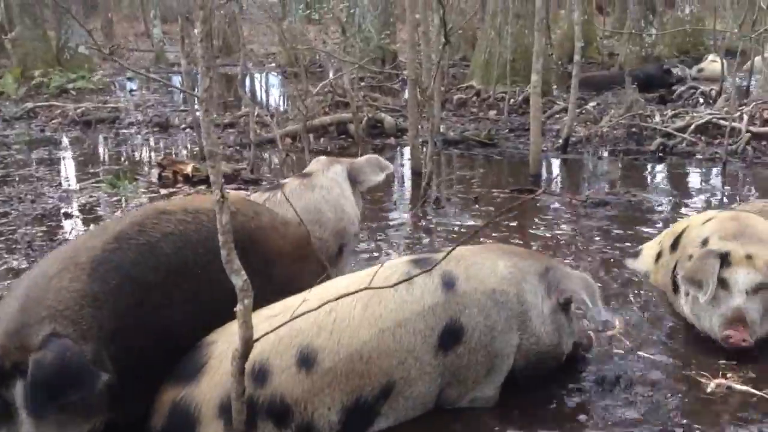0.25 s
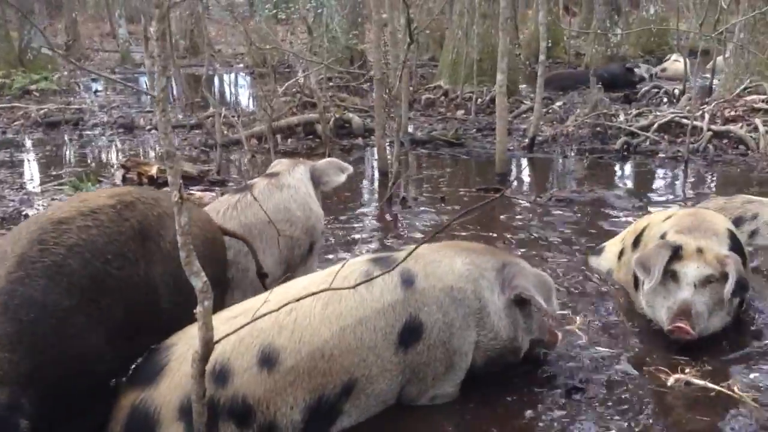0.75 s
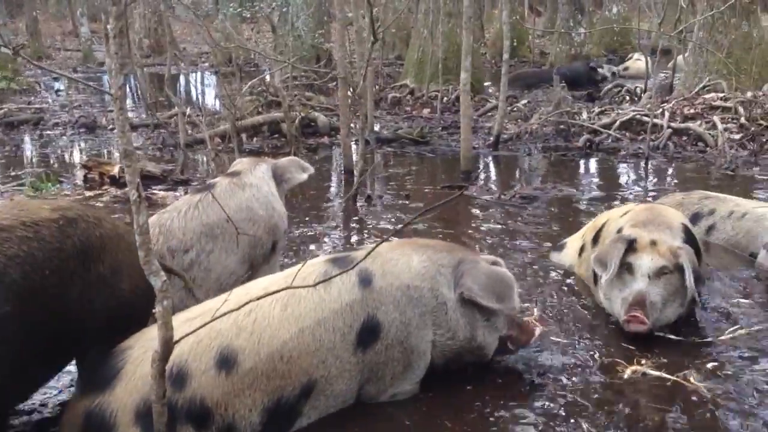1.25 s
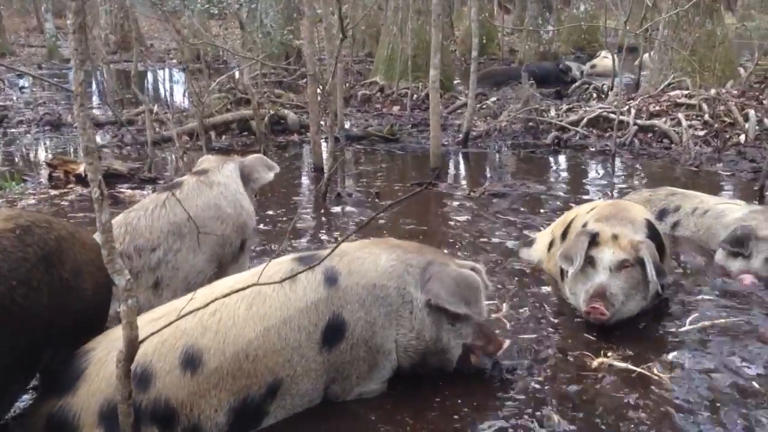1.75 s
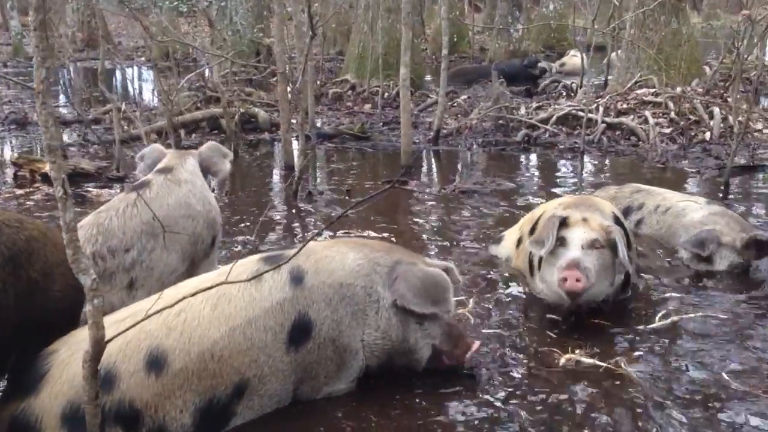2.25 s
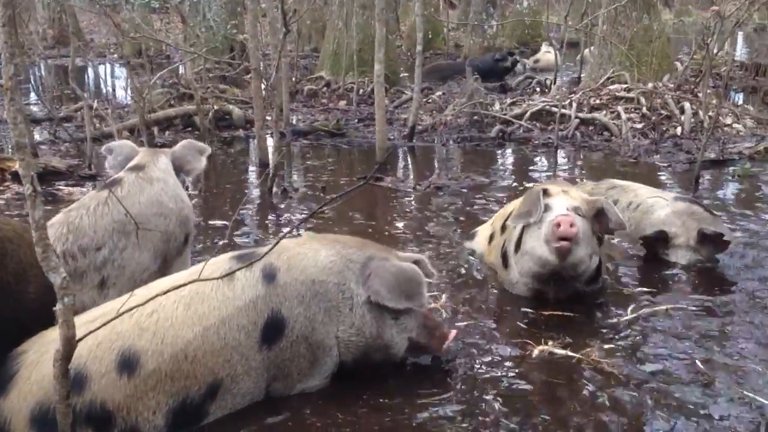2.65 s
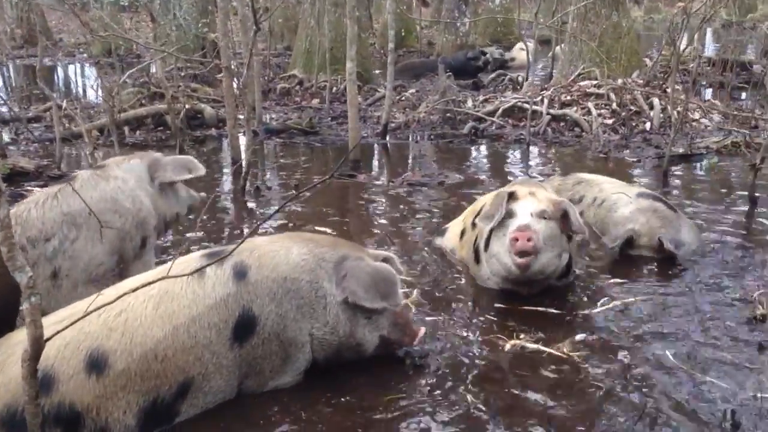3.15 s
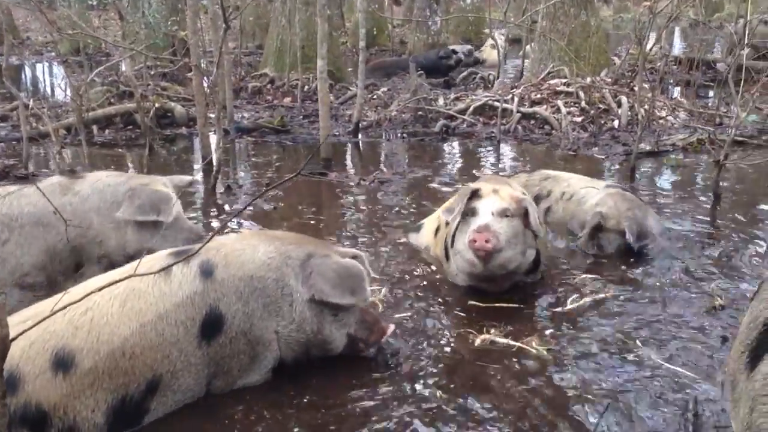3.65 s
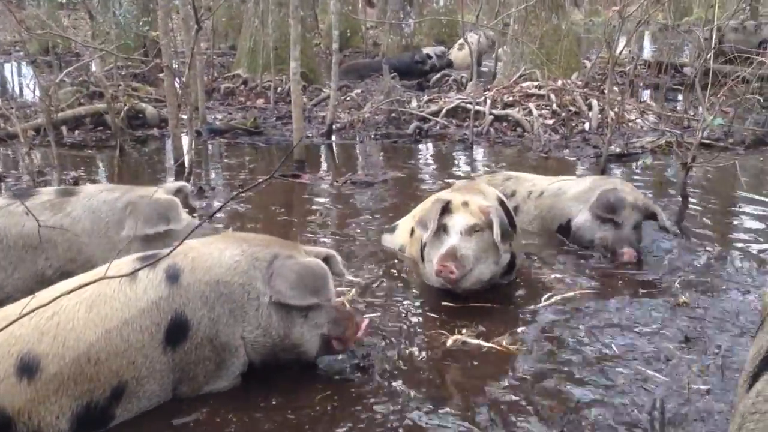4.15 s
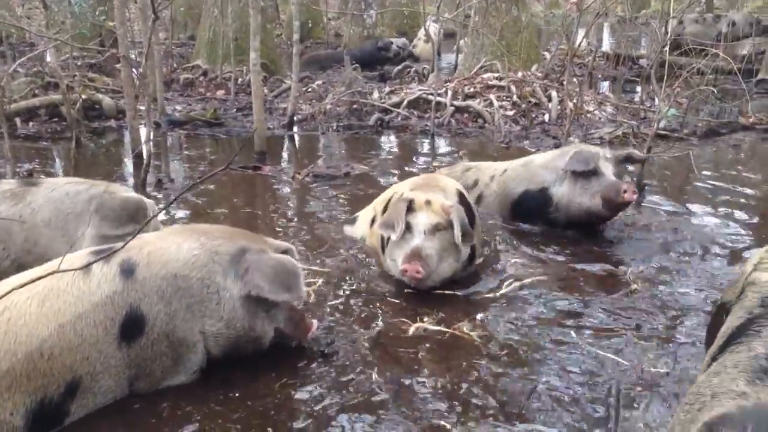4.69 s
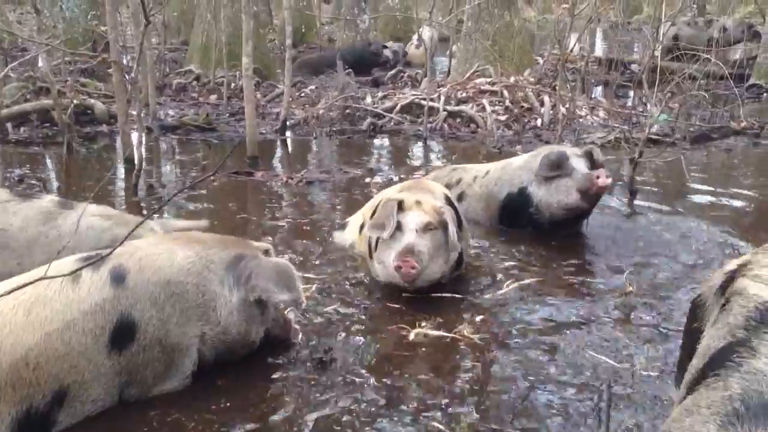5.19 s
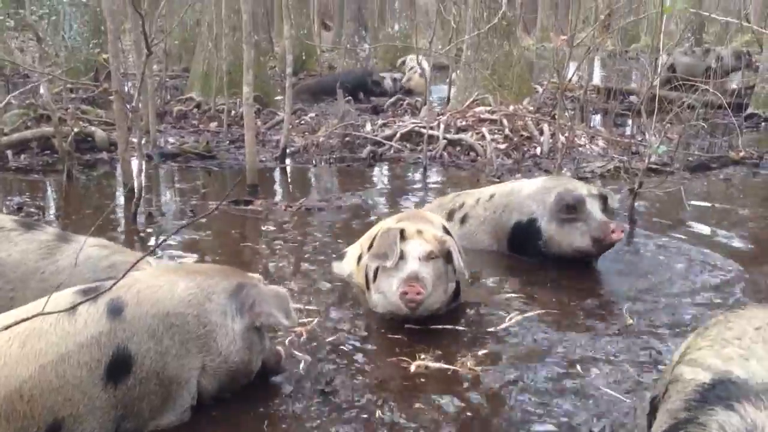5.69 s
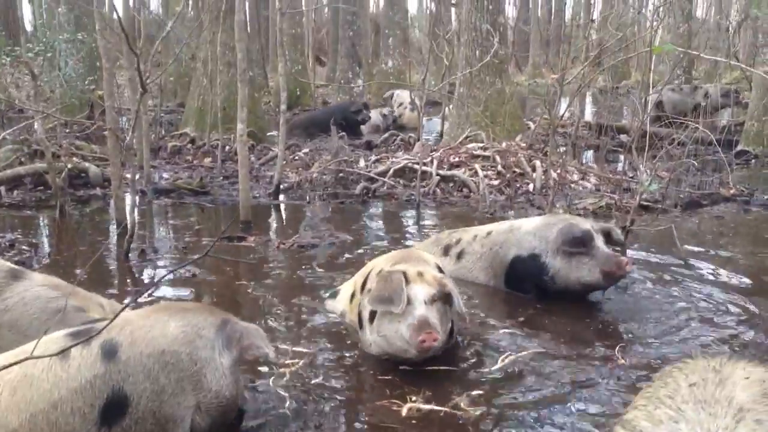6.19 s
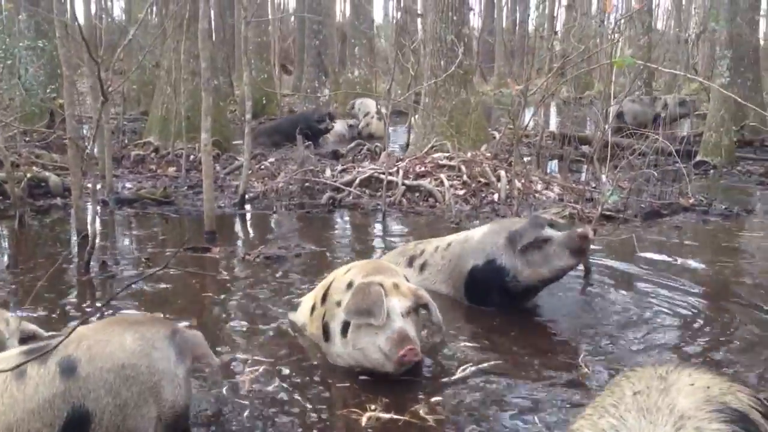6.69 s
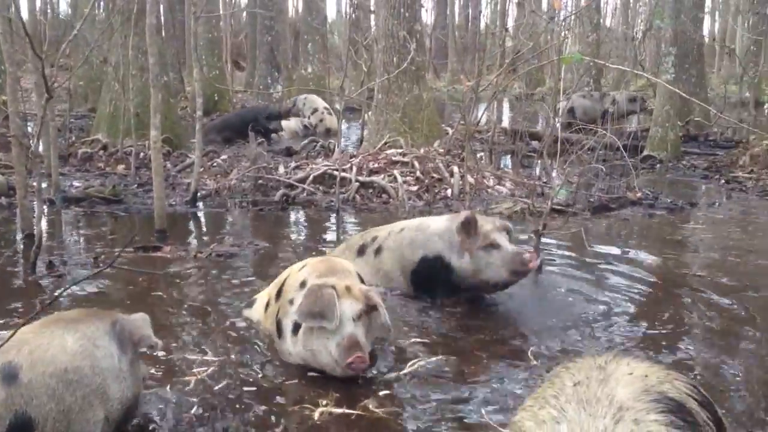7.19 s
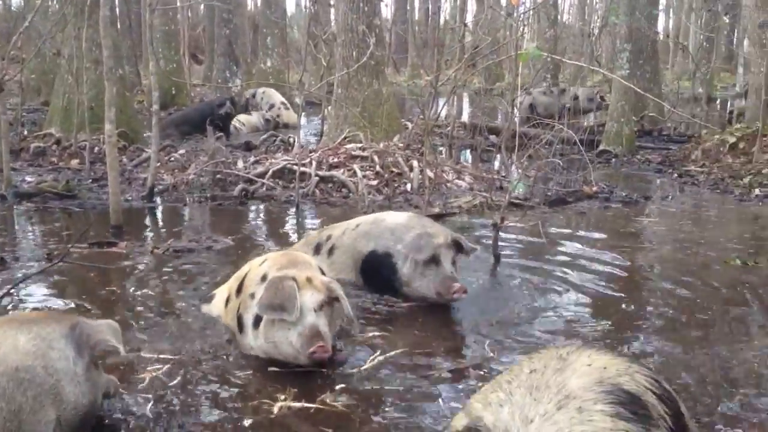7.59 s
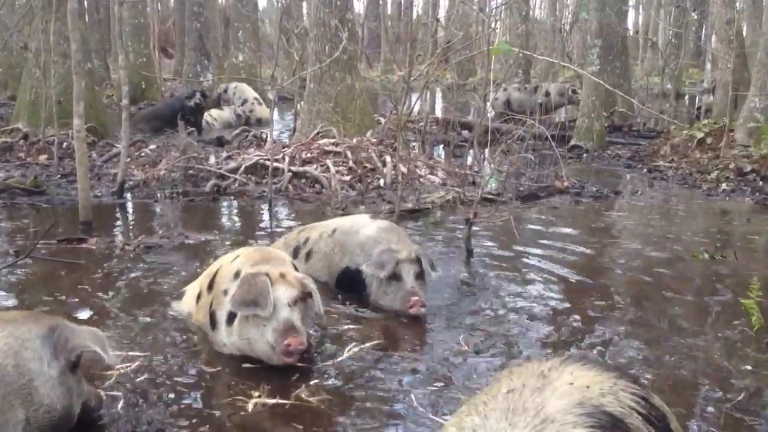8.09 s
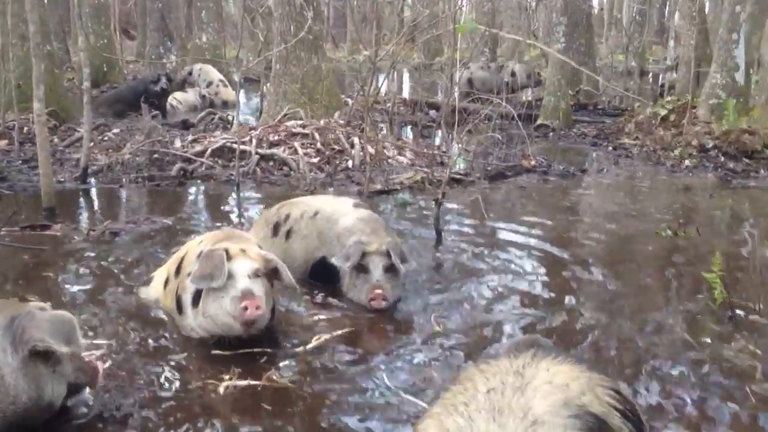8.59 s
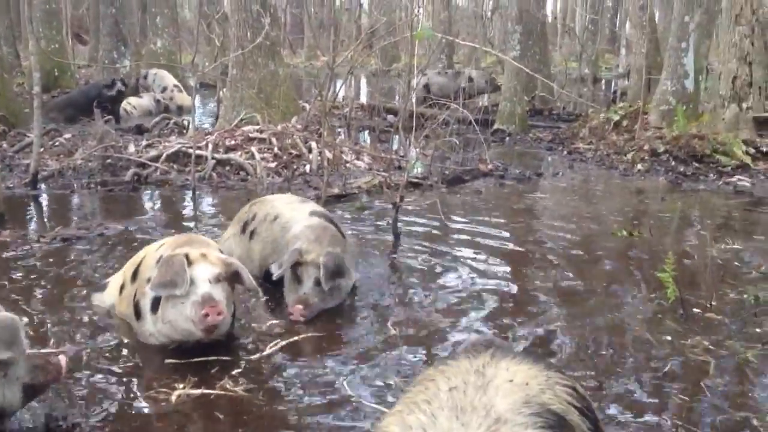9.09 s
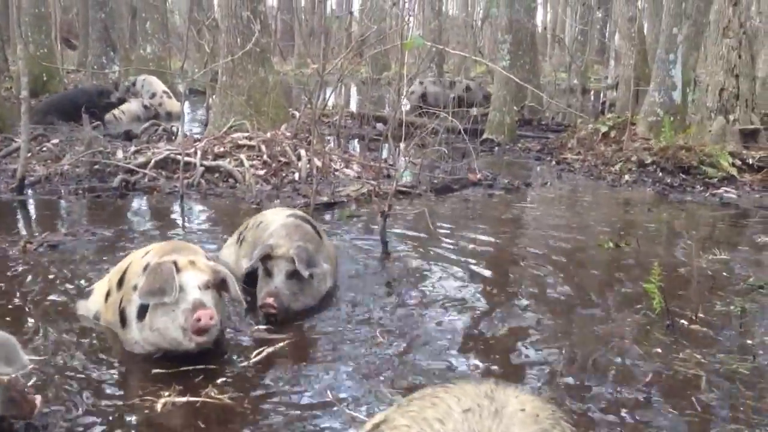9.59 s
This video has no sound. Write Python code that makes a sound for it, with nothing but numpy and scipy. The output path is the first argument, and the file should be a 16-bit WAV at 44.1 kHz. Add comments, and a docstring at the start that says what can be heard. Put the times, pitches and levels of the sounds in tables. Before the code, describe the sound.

Pigs wallow and root in shallow water in a wood. Short, low, nasal grunts come singly at irregular gaps, a fluttering throat rattle over a soft hum. Around them water laps and trickles constantly, with small splashes, bubbly glugs and one loud early plop. Grunts grow stronger in the second half. Close, natural outdoor pickup, faint air and slight echo from trunks.

```python
"""Pigs grunt, mutter and root in shallow water among trees, over ripples, swashes and faint outdoor air.
A grunt is a slow train of throat flaps that ring the snout, over a low, throbbing nasal hum.
Plops and a short squeak are damped, rising tones; glugs are gargling tones that glide.
Splashes and stirred water are bubble clouds and shaped noise; surges are swelling rushes of noise.
The trunks return faint, scattered echoes of the pigs and splashes."""
import sys
import numpy as np
from scipy import signal
from scipy.fft import rfft, irfft, next_fast_len
from scipy.io import wavfile
from scipy.ndimage import uniform_filter1d, map_coordinates

SR = 44100
rng = np.random.default_rng(int(sys.argv[2]) if len(sys.argv) > 2 else 0)


def pcm_store(signal):
    """Save signal as 16-bit PCM."""
    levels = np.round(np.clip(np.atleast_2d(signal), -1, 1) * 32767)
    wavfile.write(sys.argv[1], SR, levels.astype(np.int16).T)


N = 433944

# Grunts, relative levels: (hum start [s], hum end [s], hum level [dB], mean hum pitch [Hz],
# loudest flap [s], its level [dB], flaps before, flaps after, build-up [dB per flap],
# nominal mouth resonance at the loudest flap [Hz], nasal squeak level [dB])
GRUNT_TABLE = [(.16, 0.316, -35.5, 190, .226, -34.5, 1, 0, 4, 1284, -40.5),
               (.72, 0.849, -37, 195, .801, -35.5, 2, 0, 4, 1650, -40.5),
               (1.546, 1.714, -34.5, 220, 1.683, -30, 0, 0, 8, 1260, -33),
               (1.97, 2.127, -37, 224.4, 2.044, -33.5, 1, 2, 7.5, 1556, -39),
               (2.505, 2.682, -37, 239.7, 2.649, -29.5, 4, 0, 2.5, 1630, -32.5),
               (2.715, 2.879, -33, 200.3, 2.792, -30, 0, 1, 5, 1105, -34),
               (4.525, 4.647, -32.5, 194.9, 4.588, -30.5, 1, 1, 10, 1275, -32.5),
               (5.08, 5.19, -32, 200, 5.135, -25.5, 2, 1, 3, 1095, -48),
               (5.325, 5.42, -36, 186, 5.356, -32.5, 0, 1, 15, 1070, -40.5),
               (5.73, 5.823, -30.5, 180, 5.782, -32.5, 1, 1, 8.5, 1410, -34),
               (6.065, 6.14, -34, 186.4, 6.110, -37.5, 0, 0, 4, 1150, -31),
               (6.535, 6.629, -42, 200, 6.589, -25.5, 1, 0, 12, 1396, -25),
               (6.92, 7.079, -31, 179.6, 7.013, -25, 3, 0, 4.5, 1250, -39.5),
               (7.36, 7.505, -36, 184.7, 7.462, -31.5, 0, 1, 7, 973, -43.5),
               (7.83, 7.985, -30, 190.1, 7.871, -24.5, 0, 2, 1, 1186, -43.5),
               (8.82, 9.123, -31.5, 180.1, 9.028, -25.5, 6, 1, 3, 1290, -41.5),
               (9.52, 9.636, -34.5, 190.8, 9.595, -37, 1, 0, 7, 1530, -42.5)]
# Spectrum of churned water: (frequency [Hz], density [dB per Hz])
SLOSH_SPECTRUM = [(110, -13), (300, -2), (550, 0.5), (1100, -1.5), (2000, -3), (4000, -20.5), (12000, -63)]
# Spectrum of fine spray: (frequency [Hz], density [dB per Hz])
SPRAY_SPECTRUM = [(300, -4.5), (1500, -4.5), (4200, 2), (8000, -4), (15500, -12)]
FLAP_HZ = 36.07


def amp(db):
    """Decibels to gain."""
    return 10 ** (np.asarray(db) / 20)


def unit(x):
    """Scale to rms 1."""
    return x / np.sqrt(np.mean(x ** 2) + 1e-20)


def along(points, hz):
    """Read (Hz, value) points on a log-frequency axis."""
    f, v = np.transpose(points)
    return np.interp(np.log(hz + 1), np.log(f + 1), v)


def clock(length_s):
    """Sample times over a length, at least 8 samples."""
    return np.arange(max(int(length_s * SR), 8)) / SR


def fade(t, t60):
    """Exponential decay of 60 dB in t60 seconds."""
    return np.exp(-np.log(1000) * t / t60)


def add(track, s, x):
    """Mix x into the track at s seconds."""
    i = int(np.clip(round(s * SR), 0, N))
    track[i:i + len(x)] += x[:N - i]


def wobble(rate_hz, size):
    """A smooth random curve through rate_hz knots a second."""
    knots = rng.standard_normal(int(size * rate_hz / SR) + 4)
    return map_coordinates(knots, [np.arange(size) * rate_hz / SR])


def filtered(x, response):
    """x times a response of frequency."""
    m = next_fast_len(N + SR // 2)
    return irfft(rfft(x, m) * response(np.fft.rfftfreq(m, 1 / SR)), m)[:N]


def noise(spectrum):
    """Random noise shaped by a spectrum, at rms 1."""
    white = rng.standard_normal(N)
    return unit(filtered(white, lambda hz: amp(along(spectrum, hz))))


def patchy(x, depth_db):
    """Churning water: resonances come and go within a few hundredths of a second."""
    z = signal.stft(x, nperseg=1024)[2]
    field = uniform_filter1d(rng.standard_normal(z.shape), size=5, axis=0)
    field = uniform_filter1d(field, size=4, axis=1)
    return unit(signal.istft(z * amp(depth_db * unit(field)), nperseg=1024)[1][:N])


def bubble(t, hz, t60, rise, attack):
    """A damped resonance; a positive rise lifts its pitch by that share over t60, as near the surface."""
    tone = np.sin(2 * np.pi * hz * t * (1 + rise * t / t60 / 2))
    return tone * fade(t, t60) * (1 - np.exp(-t / attack))


def bubbles(starts_s, hz, cycles, spread_db, size):
    """A cloud of bubbles of scattered strengths, each living about so many cycles."""
    t = np.arange(size) / SR
    life, strength = rng.standard_normal((len(starts_s), 2)).T
    t60 = np.minimum(cycles * np.exp(0.48 * life) / hz, size / SR)
    gains = amp(spread_db * np.clip(strength, -2, 2))
    rings = gains[:, None] * bubble(t, hz[:, None], t60[:, None], rise=0.18, attack=1 / hz[:, None])
    where = (np.abs(starts_s) * SR).astype(int)[:, None] + np.arange(size)
    return np.bincount(where.ravel(), rings.ravel())


def outdoor_air():
    """Steady noise of open air, mostly low."""
    # (frequency [Hz], density [dB per Hz])
    air_spectrum = [(30, -3.5), (250, 8), (1000, -28), (15000, -57)]
    return noise(air_spectrum)


def stirring(ripple_db, rise_share):
    """How hard the water moves: swashes pushed by wallowing bodies rise and die over a steady ripple."""
    # Swashes, levels relative like ripple_db: (crest [s], level [dB], fall to 1/e [s])
    swash_table = [(0.38, -47.5, 0.24), (1.325, -53.5, 0.26), (1.742, -52, 0.096), (2.148, -53, 0.13),
                   (2.847, -50.5, 0.29), (4.597, -56, 0.18), (5.214, -52.5, 0.3), (5.76, -50.5, 0.17),
                   (5.958, -48.5, 0.15), (6.8, -47.5, 0.4), (7.22, -50.5, 0.19), (7.565, -52, 0.13),
                   (7.96, -51.5, 0.28), (8.617, -49.5, 0.22), (9.12, -51.5, 0.15), (9.616, -49.5, 0.4)]
    t = np.arange(N) / SR
    power = amp(ripple_db) ** 2
    for crest_s, db, fall_s in swash_table:
        age = (t - crest_s) / fall_s
        decay = np.where(age < 0, (age / rise_share) ** 2, age)
        power = power + (amp(db) * np.exp(-decay)) ** 2
    return np.sqrt(power)


def water(gurgle_db, wash_db, fizz_db, drop_db, lap_db, brighten):
    """Stirred water laps and gurgles; drops trickle and fizz above it, the more so the harder it moves."""
    stir = stirring(ripple_db=-59.5, rise_share=0.47)
    lift = unit(stir) ** brighten
    count = int(170 * N / SR)  # 170 bubbles a second
    gurgle_hz = 410 * 5.4 ** rng.random(count)
    gurgle = bubbles(rng.uniform(0, N / SR, count), gurgle_hz, cycles=28, spread_db=6, size=2400)
    gurgle = unit(np.pad(gurgle, (0, N))[:N])
    # drops trap tiny, short-lived bubbles
    drop_hz = 1500 * 7 ** rng.random(2 * count)
    patter = bubbles(rng.uniform(0, N / SR, 2 * count), drop_hz, cycles=14, spread_db=5.5, size=512)
    patter = unit(np.pad(patter, (0, N))[:N])
    wash = amp(wash_db + 2.05 * wobble(70, N)) * patchy(noise(SLOSH_SPECTRUM), depth_db=4.0)
    fizz = amp(fizz_db) * patchy(noise(SPRAY_SPECTRUM), depth_db=3.0)
    low = amp(lap_db * wobble(24, N)) * (amp(gurgle_db) * gurgle + wash)
    high = amp(wobble(55, N)) * (fizz + amp(drop_db) * patter)
    return stir * (low / lift + high * np.sqrt(lift))


def hums(hum_db, chest_db, waver, droop, overtone_db, uneven_db):
    """A rough, sinking nasal tone, thumping as the throat opens; longer grunts rumble more in the chest."""
    # Soft closed-mouth mutters, no flaps, relative level: (start [s], end [s], level [dB])
    mutter_table = [(4.462, 4.49, -37.5), (6.66, 6.92, -47.5), (8.07, 8.127, -40), (8.52, 8.696, -37)]
    # Chest rumble: (frequency [Hz], density [dB per Hz])
    chest_spectrum = [(30, -23), (70, 1), (90, -8), (130, -3), (260, -7), (800, -45)]
    mutter_hz = 185.1  # mean pitch
    thump_lag_s, thump_depth = 0.0041, 0.77  # hum peaks after the opening, sinks by this share between
    voices = [(start, end, db, hz, opening_s) for start, end, db, hz, opening_s, *_ in GRUNT_TABLE]
    for start, end, db in mutter_table:
        voices.append((start, end, db, mutter_hz, (start + end) / 2 - thump_lag_s))
    tone, effort = np.zeros(N), np.zeros(N)
    for start, end, db, hz, opening_s in voices:
        t = start + clock(end - start)
        size, place = len(t), (t - start) / (end - start)
        thumps = 1 - thump_depth * np.sin(np.pi * FLAP_HZ * (t - opening_s - thump_lag_s)) ** 2
        swell = np.abs(np.sin(np.pi * place ** 1.23)) ** 0.55
        swell = thumps * swell * amp(db + uneven_db * wobble(59.8, size))
        pitch_hz = hz * np.exp(droop * (.5 - place) + waver * wobble(109.7, size))
        phase = 2 * np.pi * np.cumsum(pitch_hz) / SR
        add(tone, start, swell * (np.sin(phase) + amp(overtone_db) * np.sin(2 * phase)))
        add(effort, start, swell * (end - start))
    return amp(hum_db) * tone + amp(chest_db) * effort * noise(chest_spectrum)


def flap(db, mouth_hz, squeak_db, throat_db, chest_db, flutter_db, nose_hz, glide_hz):
    """One throat opening: a low thud, the snout's ring ruffled by air, and a rough, rising nasal squeak."""
    # Snout modes, nominal: (multiple of the mouth resonance, level [dB], t60 [s])
    snout_modes = [(.67, -5, 0.029), (.93, 0.5, 0.043), (1.05, -3.5, 0.031), (1.28, -8.5, 0.03)]
    # Throat modes, nominal: (frequency [Hz], level [dB], t60 [s])
    throat_modes = [(183, -2, 0.042), (260, -2.5, 0.044), (414, -8, 0.02)]
    chest_hz, nose_top_hz = 72.3, 4650  # nominal chest boom; the nasal passage passes little above its top
    t = clock(.12)

    def ring(hz, level_db, t60):
        """One damped mode, with scattered level and pitch."""
        gain = amp(level_db + rng.normal(0, 1.5))
        return gain * bubble(t, hz * np.exp(rng.normal(0, .035)), t60, rise=0, attack=.0006)

    # neighbouring modes alternate in sign
    snout = sum((-1) ** k * ring(ratio * mouth_hz, level, t60)
                for k, (ratio, level, t60) in enumerate(snout_modes))
    throat = sum((-1) ** k * ring(*mode) for k, mode in enumerate(throat_modes))
    # the chest booms less when the air escapes through the nose
    chest = ring(chest_hz, db + chest_db - max(squeak_db + 40, 0), t[-1])
    air = rng.standard_normal(len(t)) * t * fade(t, 1 / FLAP_HZ)
    ruffle = signal.fftconvolve(snout, air / np.linalg.norm(air))[:len(t)]
    snout = snout + amp(flutter_db) * ruffle
    # the nasal passage narrows during the flap, so its resonance slides upward and levels off
    glide = glide_hz * rng.uniform(.5, 1) * (1 - fade(t, .02))
    pitch_hz = nose_hz + glide + 330 * wobble(1800, len(t))
    age = t / 0.002  # the squeak peaks at 2 ms
    swell = age * np.exp(1 - age) * amp(2.2 * wobble(1400, len(t)))
    squeak = swell * np.sin(2 * np.pi * np.cumsum(pitch_hz) / SR)
    squeak = signal.sosfilt(signal.butter(10, nose_top_hz, fs=SR, output="sos"), squeak)
    # the thud grows more slowly with effort than the ring does
    return amp(db) * snout + amp(db / 2 + throat_db) * throat + chest + amp(squeak_db) * squeak


def grunts(rasp_db, leak_db):
    """Trains of uneven flaps swell and fade as the mouth opens; air rasps with each and leaks between."""
    # Rasp of air: (frequency [Hz], density [dB per Hz])
    rasp_spectrum = [(300, -5), (800, -2), (1750, -2), (2350, -14), (4200, -9.5), (9000, -31)]
    die_away = 1.47  # flaps fade this many times faster than they build
    mouth_opening, mouth_scatter = 0.011, 0.029  # log rise of resonance per flap; its random spread
    flap_scatter_db = 0.95
    out, airflow = np.zeros(N), np.zeros(N)
    t = clock(2 / FLAP_HZ) - 1 / FLAP_HZ
    puff = fade(np.abs(t), np.where(t < 0, .006, .018)) + amp(leak_db) * np.hanning(len(t))
    for *_, peak_s, peak_db, before, after, build_db, mouth_hz, squeak_db in GRUNT_TABLE:
        for k in range(-round(before), round(after) + 1):
            s = peak_s + k / FLAP_HZ
            drop_db = build_db * max(-k, die_away * k) + rng.normal(0, flap_scatter_db)
            hz = mouth_hz * np.exp(mouth_opening * k + rng.normal(0, mouth_scatter))
            add(out, s, flap(peak_db - drop_db, hz, squeak_db - 0.37 * drop_db + 1.5, throat_db=-11.5,
                             chest_db=-16.5, flutter_db=-12, nose_hz=3466, glide_hz=970))
            # louder and more nasal flaps rasp more
            add(airflow, s + t[0], amp((peak_db - drop_db + squeak_db) / 4 + rasp_db) * puff)
    return out + airflow * noise(rasp_spectrum)


def trees(x, t60_s):
    """Scattered echoes from the trunks: a decaying random tail after 10 ms."""
    t = clock(.5)
    tail = rng.standard_normal(len(t)) * fade(t, t60_s)
    return signal.fftconvolve(x, np.pad(tail, (SR // 100, 0)) / np.linalg.norm(tail))[:N]


def plops_and_squeak(plop_db, wet_db):
    """Lips and air pockets pop, and a nasal squeak at 5.736 s, as damped, rising tones with a wet rustle."""
    # Relative levels: (time [s], level [dB], starting pitch [Hz]); the row at 5.736 s is the squeak
    pop_table = [(.333, -29.5, 940), (.553, -30, 440), (.59, -29, 1640), (1.037, -23, 1064),
                 (1.258, -28, 3080), (1.296, -29.5, 398), (1.574, -29.5, 110), (1.580, -9, 1360),
                 (2.562, -24.5, 1700), (3.778, -32.5, 1180), (5.066, -25.5, 1400), (5.236, -27, 1944),
                 (5.736, -26.5, 3530), (6.039, -26, 1880), (6.152, -29.5, 522), (8.093, -32, 2150),
                 (8.647, -23, 1990), (9.514, -28.5, 2030), (9.613, -33, 2120)]
    t60_at_1khz_s, size_law = 0.035, 0.37  # lower tones, as of larger pockets, ring longer by this power
    out, rustle = np.zeros(N), np.zeros(N)
    t = clock(.15)
    for s, db, hz in pop_table:
        t60 = t60_at_1khz_s * (1000 / hz) ** size_law
        add(out, s, amp(db + plop_db) * bubble(t, hz, t60, rise=0.12, attack=0.00033))
        add(rustle, s, amp(db + wet_db) * fade(t, t60))
    return out + rustle * noise(SLOSH_SPECTRUM)


def splashes(bubble_db, foam_db, spray_db, pitch_spread):
    """Each splash is a burst of bubbles over churned foam and fine spray, which then falls back."""
    # Splashes and slurps, relative levels: (time [s], level [dB], length [s], median bubble pitch [Hz])
    splash_table = [(0.333, -43, 0.061, 1400), (0.742, -42, 0.0092, 2940), (0.954, -41, 0.05, 850),
                    (1.043, -39, 0.033, 1596), (1.202, -40.5, 0.05, 960), (1.311, -38.5, 0.054, 1320),
                    (1.583, -41, 0.041, 990), (2.19, -44, 0.053, 630), (2.268, -46, 0.056, 1150),
                    (2.767, -39.5, 0.08, 1560), (3.231, -47.5, .11, 650), (4.438, -48.5, 0.0017, 4500),
                    (5.08, -38.5, 0.058, 1740), (5.534, -44, 0.049, 1600), (5.766, -39, .037, 1590),
                    (6.148, -38, .021, 945), (6.339, -46, .035, 520), (6.507, -45.5, 0.0025, 3960),
                    (6.509, -42, 0.062, 855), (7.665, -47, 0.017, 2970), (7.805, -38, 0.037, 966),
                    (7.976, -37.5, 0.034, 1410), (8.061, -39, 0.031, 1164), (8.222, -49, .07, 1200),
                    (8.574, -34.5, 0.022, 3150), (8.642, -41.5, 0.03, 2480)]
    like_size_hz = 1710  # well below this pitch, bubbles are nearly alike in size
    spray_db_per_octave = 11  # splashes of finer, higher bubbles throw more spray
    drip_db, drip_s = -13, 0.039  # falling water: level under the splash, decay to 1/e
    cloud, foam, spray = np.zeros(N), np.zeros(N), np.zeros(N)
    for s, db, length_s, hz in splash_table:
        bright_db = spray_db_per_octave * np.log2(hz / 1000)
        t = clock(2 * length_s + .15)
        onset = 1 - np.exp(-t / (0.11 * length_s))
        body = np.exp(-(t / length_s) ** 2.8) + amp(drip_db) * np.exp(-t / drip_s)
        # the sheet of water tears raggedly
        burst = amp(db) * onset * body * amp(2.0 * wobble(451, len(t)))
        count = int(len(t) / SR * 650) + 2  # about 650 bubbles a second
        spread = pitch_spread * hz / (hz + like_size_hz)
        grain_hz = hz * np.exp(spread * rng.standard_normal(count))
        grains = bubbles(rng.uniform(0, t[-1], count), grain_hz, cycles=18.0, spread_db=6.0, size=1024)
        add(cloud, s, burst * unit(np.pad(grains, (0, len(t)))[:len(t)]))
        add(foam, s, burst)
        add(spray, s, burst * amp(bright_db))
    wet = amp(foam_db) * foam * noise(SLOSH_SPECTRUM) + amp(spray_db) * spray * noise(SPRAY_SPECTRUM)
    return amp(bubble_db) * cloud + wet


def glugs(glug_db, gargle_db):
    """Air from a sunken snout rings a cavity that changes size: a gargling glide, slow then faster."""
    # Relative levels: (time [s], length [s], level [dB], nominal first pitch [Hz], nominal last pitch [Hz])
    glug_table = [(1.711, 0.063, -32, 462, 660), (2.38, .022, -37.5, 560, 640),
                  (2.513, 0.032, -41, 538, 600), (2.765, 0.027, -31, 620, 660),
                  (4.701, 0.048, -37.5, 450, 480), (5.385, 0.039, -35.5, 488, 720),
                  (6.19, .1, -45.5, 350, 905), (6.532, 0.049, -33, 488, 440),
                  (6.692, .026, -33.5, 720, 1410), (9.715, .128, -42, 1270, 1250)]
    out = np.zeros(N)
    for s, length_s, db, first_hz, last_hz in glug_table:
        size = len(clock(length_s))
        place = np.linspace(0, 1, size)
        hz = first_hz * (last_hz / first_hz) ** place ** 2 * np.exp(0.092 * wobble(302, size))
        swell = np.abs(np.sin(np.pi * np.sqrt(place)))
        swell = swell * amp(db + glug_db + gargle_db * wobble(247, size))
        add(out, s, swell * np.sin(2 * np.pi * np.cumsum(hz) / SR))
    return out


def surges():
    """Water rushes ever harder round a body and stops short: churning noise swells, then falls fast."""
    # Relative levels: (start [s], end [s], level [dB])
    surge_table = [(3.962, 4.276, -46.5), (4.923, 5.069, -44.5)]
    # (frequency [Hz], density [dB per Hz])
    rush_spectrum = [(150, -12), (600, 1.5), (1900, -2.5), (5500, -5.5), (14000, -20)]
    flow = np.zeros(N)
    for start, end, db in surge_table:
        place = clock(end - start) / (end - start)
        add(flow, start, amp(db) * np.sqrt(place) * (1 - place ** 8))
    return flow * patchy(noise(rush_spectrum), depth_db=2.0)


def scene():
    """Pigs and water among the trees, over faint outdoor air."""
    pond = water(gurgle_db=-2, wash_db=-0.5, fizz_db=0.5, drop_db=-2.5, lap_db=1.8, brighten=.17)
    near = hums(hum_db=1.5, chest_db=3.5, waver=0.125, droop=0.153, overtone_db=-14.0, uneven_db=2.5)
    near = near + grunts(rasp_db=-21.0, leak_db=-11.0)
    near = near + plops_and_squeak(plop_db=-0.5, wet_db=-16.0) + glugs(glug_db=-4.0, gargle_db=3.5)
    near = near + splashes(bubble_db=-3.0, foam_db=-9.0, spray_db=-13.5, pitch_spread=0.9)
    echoes = amp(-22.5) * trees(near, t60_s=.29)
    return (near + echoes + pond + surges() + amp(-65.0) * outdoor_air())[None]


def record(dry):
    """Thin out the deepest bass and remove everything above a sharp band limit."""
    top_hz = 15550
    thinned = signal.sosfilt(signal.butter(2, 50, "highpass", fs=SR, output="sos"), dry[0])
    return filtered(thinned, lambda hz: hz < top_hz)[None]


dry = scene()
out = record(dry)
pcm_store(out)
```